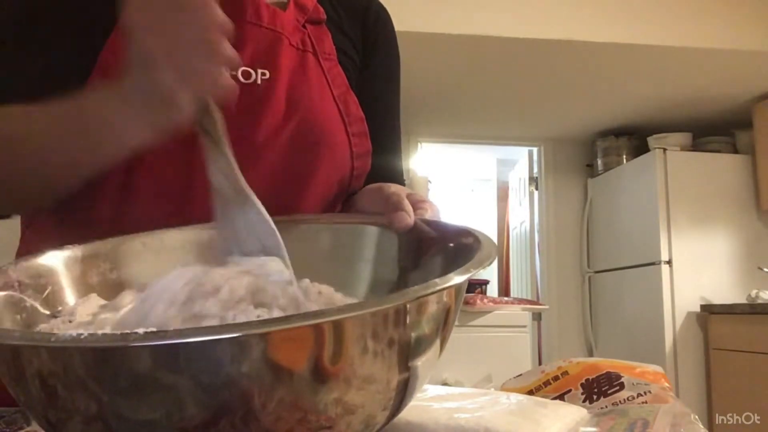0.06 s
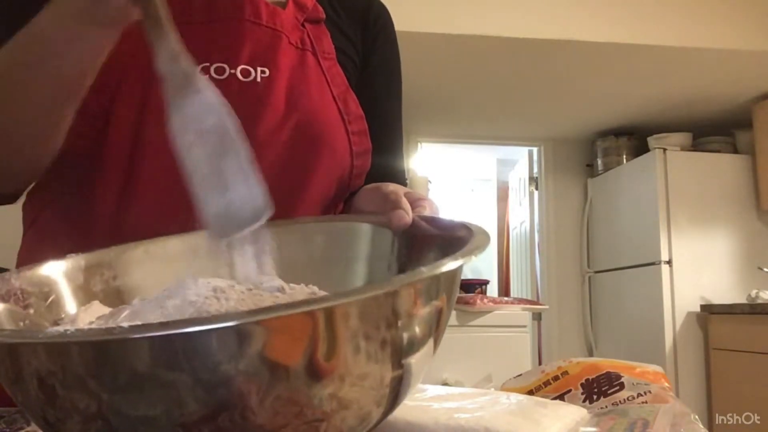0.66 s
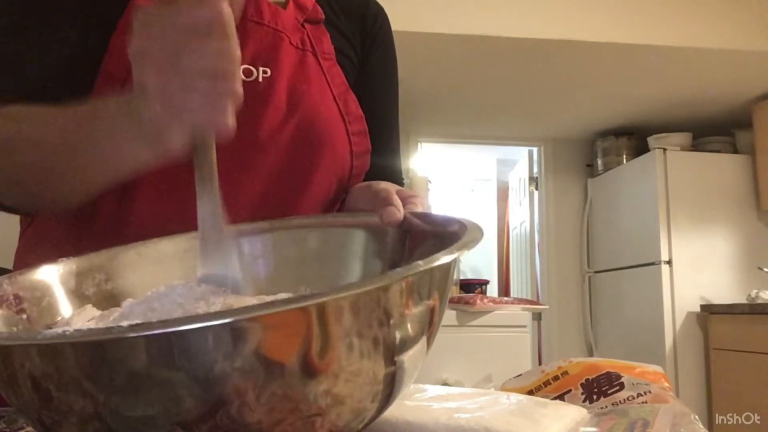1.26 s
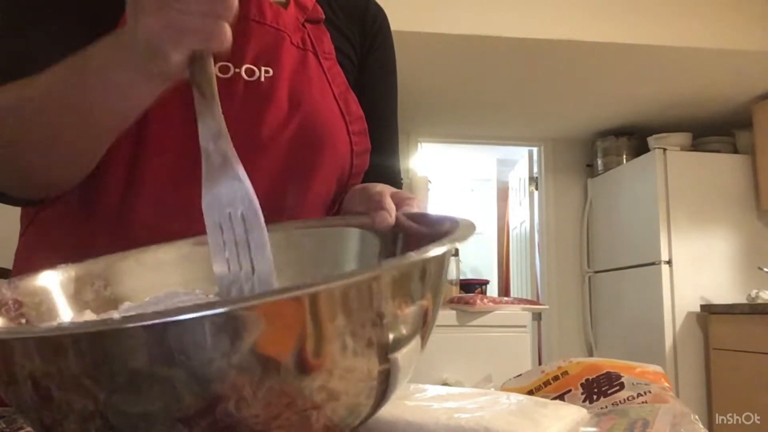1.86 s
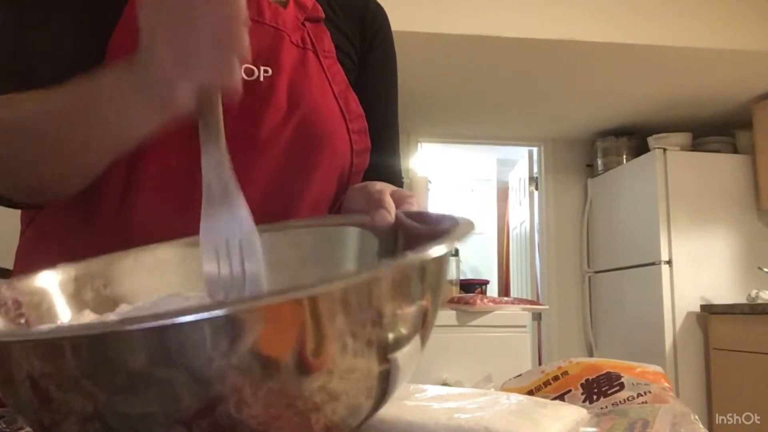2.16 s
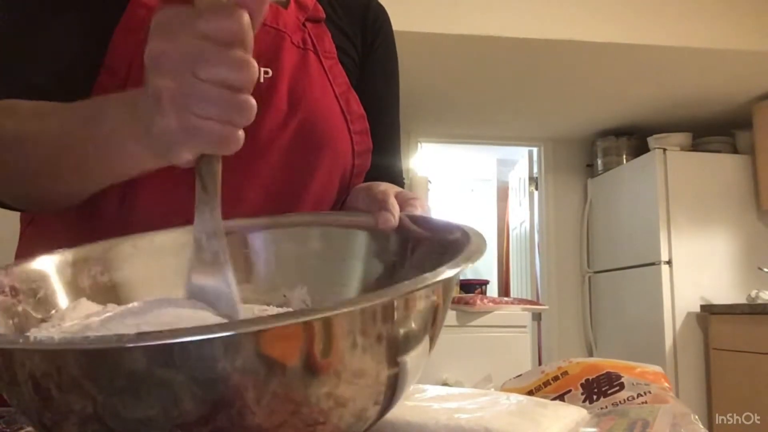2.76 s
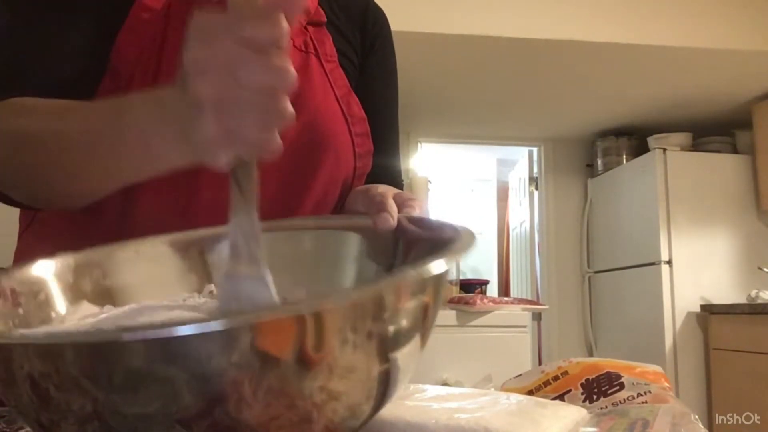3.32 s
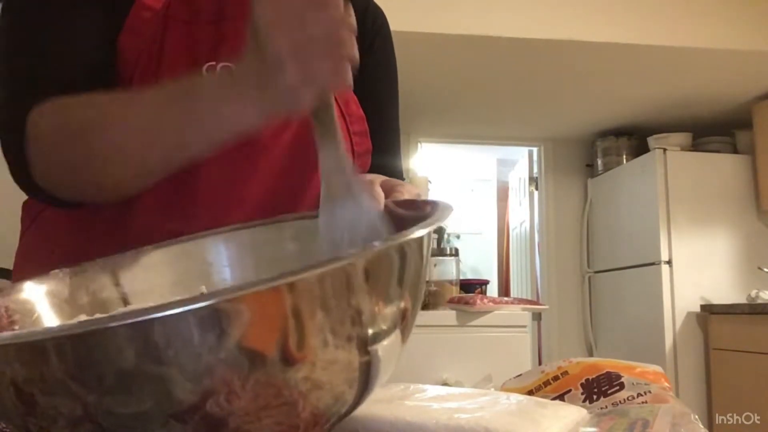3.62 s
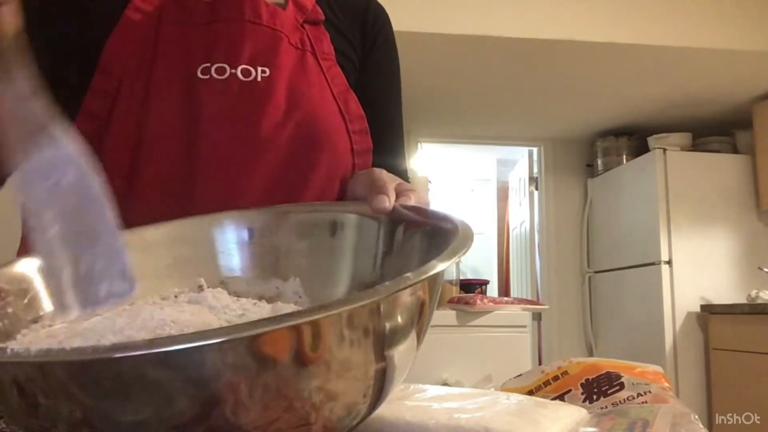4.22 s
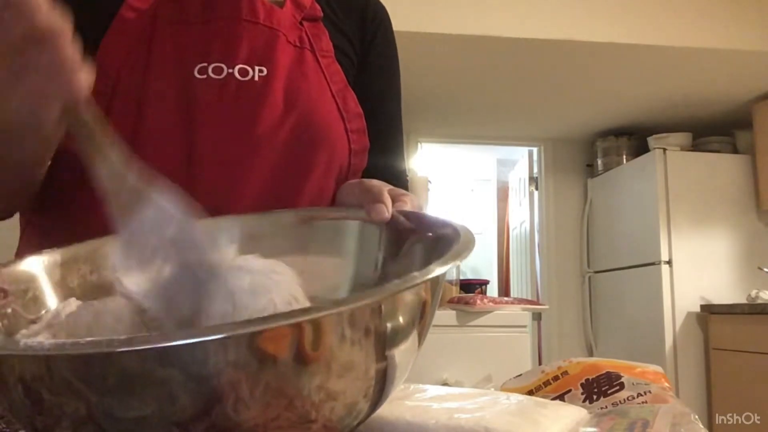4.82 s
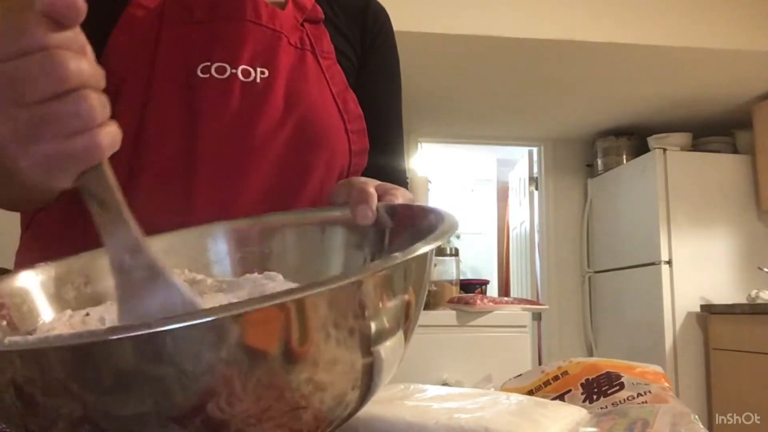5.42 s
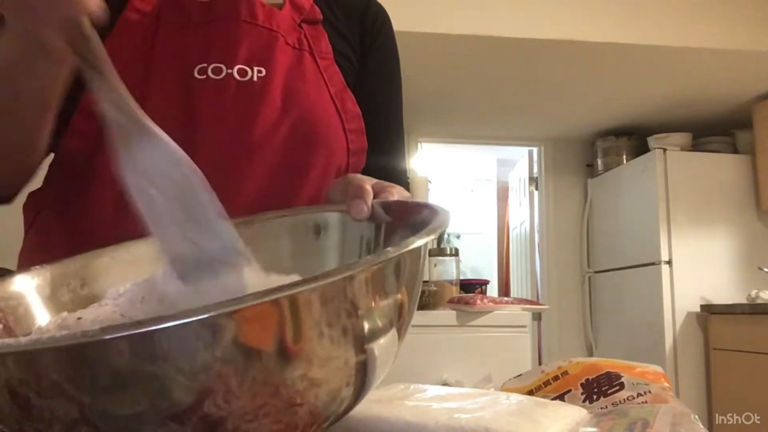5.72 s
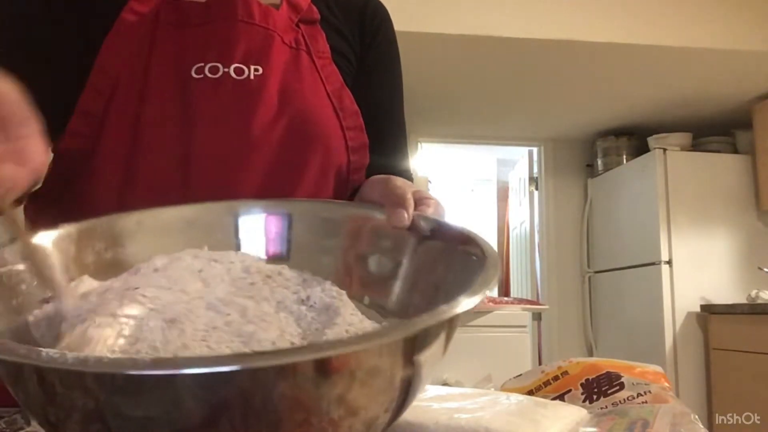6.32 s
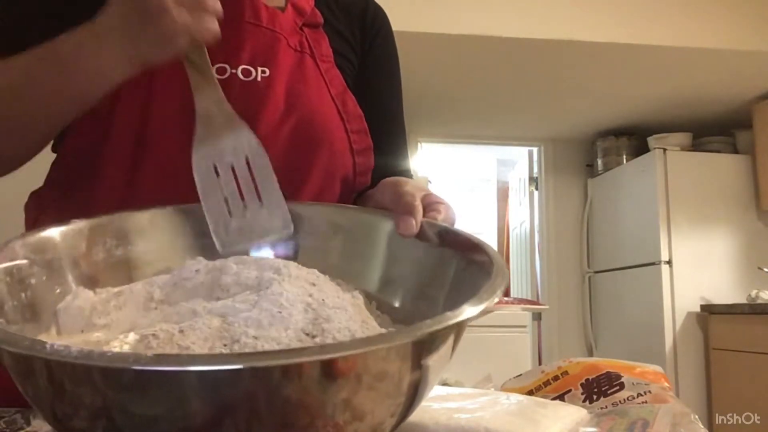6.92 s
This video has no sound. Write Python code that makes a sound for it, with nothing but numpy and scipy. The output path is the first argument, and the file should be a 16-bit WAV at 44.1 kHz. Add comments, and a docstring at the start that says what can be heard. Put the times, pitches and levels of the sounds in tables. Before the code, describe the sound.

Dry flour is stirred in a metal bowl, with soft gritty scrapes, dull ringing knocks and a final clack on the rim.

```python
"""Stirring flour in a steel bowl

A spatula stirs and chops dry flour mix in a hand-held steel bowl. The blade scrapes over trapped
grains, powder hisses off it, and it ticks now and then. It lands on the padded bottom with thuds that
sweep down in pitch and taps the wall; the handle clacks twice on the rim. A small kitchen rumbles softly."""
import sys
import numpy as np
from scipy import signal
from scipy.fft import rfft, irfft
from scipy.io import wavfile

SR = 44100
rng = np.random.default_rng(int(sys.argv[2]) if len(sys.argv) > 2 else 0)


def inscribe(sig):
    """Save sig as 16-bit PCM at rate SR to the path in sys.argv[1].

    A 1-D sig is mono; a 2-D sig holds one channel per row.
    Samples are clipped to [-1, 1] before scaling.
    """
    pcm = np.round(np.clip(np.atleast_2d(sig).T, -1, 1) * 32767)
    wavfile.write(sys.argv[1], SR, pcm.astype(np.int16))


N = 307818

# tone curves of the room's rumble, the gritty scrape and the powder's hiss: f/Hz, level/dB
ROOM_TONE_EQ = [(40, -43), (62, 4), (100, -1), (155, -2), (230, -12.5), (300, -11), (600, -18.5),
                (850, -26), (1500, -25), (4500, -30), (7000, -33), (14000, -39.5), (16000, -47)]
SCRAPE_EQ = [(120, 21), (300, 8), (550, 10.5), (800, 5.5), (1150, -1), (1800, -0.5), (2500, -1),
             (3800, -1.5), (6000, -9), (10000, -21), (16000, -35)]
POWDER_EQ = [(700, -13), (2000, -0.5), (4000, -2), (5700, 2.5), (7500, -0.5), (9500, -4.5), (10900, -0.5),
             (12300, -10), (14000, -3.5), (16000, -15)]
# the blade pushes through the mix: t/s of the hardest push, rise/s, fall/s, scrape/dB, powder/dB, f/Hz
STROKES = [(.315, 0.024, 0.088, -57.5, -55.5, 4100), (0.374, 0.01, 0.018, -41.5, -58, 1560),
           (0.802, 0.017, 0.06, -67, -52, 2200), (0.856, 0.023, 0.012, -43.5, -55.5, 1060),
           (1.278, 0.051, .035, -49, -53.5, 900), (1.618, 0.0094, 0.048, -45, -53, 1500),
           (1.943, 0.0068, 0.019, -53, -50, 900), (2.208, 0.017, 0.04, -61, -57.5, 800),
           (2.45, 0.0078, .025, -46.5, -52, 750), (2.678, 0.011, 0.022, -43, -50.5, 735),
           (2.76, 0.0087, 0.026, -55, -65, 700), (3.155, 0.027, .025, -43, -48, 1200),
           (3.189, 0.018, 0.033, -44, -46.5, 1370), (3.28, 0.047, 0.058, -50.5, -59.5, 1120),
           (3.625, .008, 0.065, -66, -52.5, 700), (3.75, 0.065, 0.059, -49.5, -56, 970),
           (4.21, 0.033, 0.062, -66, -65, 6400), (4.395, 0.039, 0.032, -44.5, -53, 3600),
           (4.455, 0.039, 0.033, -45.5, -51, 1290), (4.62, 0.15, 0.14, -59, -73, 900),
           (5.17, 0.05, 0.073, -51, -53, 1740), (5.32, 0.051, .04, -54, -64, 3040),
           (5.46, 0.11, 0.077, -51.5, -72, 850), (5.599, 0.03, 0.034, -55.5, -61, 1590),
           (5.94, .015, 0.089, -50, -59.5, 2220), (6.045, 0.072, 0.085, -49, -58.5, 1120),
           (6.21, 0.034, 0.079, -55.5, -61.5, 900), (6.69, 0.049, 0.021, -56.5, -62.5, 1040)]
# after a lift, powder slides off the blade and falls back: t/s, level/dB
SPILLS = [(.13, -68.5), (.52, -61.5), (.98, -61.5), (1.41, -64.5), (1.79, -69), (2.08, -64.5),
          (2.34, -66.5), (2.57, -65), (2.86, -65.5), (3.41, -63), (3.95, -62)]
# the bowl's ring, its upper modes damped by flour and hand: f/Hz, width/Hz, level/dB
BOWL_MODES = [(87.4, 4, -6), (150.9, 6.4, -0.5), (282.3, 5.9, -1), (381.3, 5.2, -2), (458, 6.6, -1),
              (503, 12.5, 3), (533.8, 8.8, 1), (584, 26, 3), (945, 170, -8), (1234, 67, 1.5),
              (1503, 235, -5), (1880, 140, -2), (2600, 320, -14.5), (2920, 54, -3), (4240, 670, -11.5),
              (5660, 750, -15), (7040, 1600, -26)]
# the spatula ticks: t/s, level/dB, f/Hz
TICKS = [(0.1515, -46.5, 5300), (0.3094, -42, 5370), (3.5603, -36.5, 5560), (3.582, -46, 5660),
         (3.592, -34, 5600), (3.598, -42, 5600), (3.617, -27.5, 5320), (4.8357, -39.5, 5440),
         (6.1563, -41, 5700)]
# the ring of a tick: multiple of its pitch, width/Hz, level/dB
SPATULA_MODES = [(1, 228, 9), (1.09, 452, 4), (1.4, 900, -7), (2.05, 2600, -15)]
# the blade lands and flexes the bowl: t/s, level/dB, low f/Hz, high f/Hz, lag of each pitch/cycles
THUDS = [(0.3644, -34.5, 51.3, 302, 4.04), (.755, -35, 350, 1510, 2.2), (0.777, -36.5, 90.5, 300, 2.1),
         (0.853, -28.5, 63, 97, 3.37), (1.188, -38, 300, 700, 2.3), (1.207, -34, 168, 724, 2.43),
         (1.2755, -39, 57.6, 900, 4.3), (1.61, -22.5, 69, 500, 2.92), (1.6333, -13, 88, 233, 1.75),
         (1.9398, -9, 113, 247, 2.17), (2.2067, -7.5, 109, 216, 1.94), (2.448, -14, 66, 554, 2.23),
         (2.6732, -9.5, 170, 466, 1.92), (2.6833, -5.5, 101, 212, 1.24), (3.093, -37.5, 220, 700, 1.8),
         (3.1781, -26, 79.5, 866, 1.93), (3.644, -35, 135, 750, 2.2), (4.388, -40, 140, 300, 2.15),
         (5.0865, -31.5, 108, 760, 2.31), (6.952, -26.5, 308, 640, 2.2)]
# the blade taps the bare wall: t/s, level/dB, body trim/dB, treble trim/dB
TAPS = [(0.3681, -33, 3, -22), (0.3774, -26.5, -13.5, -19.5), (0.7557, -27, -22, -19.5),
        (0.7795, -27.5, -14, -26), (0.856, -32, -6, -25), (1.1892, -43, -1, -14), (1.2095, -40.5, -4, -8),
        (1.278, -42, 5, -9), (1.6047, -39.5, 3.5, -27), (1.6113, -20, -5.5, -35), (1.9393, -42.5, -9, -7.5),
        (2.2045, -28.5, -8, -15), (2.4497, -34.5, -8, -12.5), (2.501, -37.5, -1, -16.5),
        (2.674, -26, -9, -17), (2.7561, -42.5, 3, -12), (3.0918, -38.5, -9, -13),
        (3.1444, -28.5, -0.5, -24), (3.1804, -31, 2, -8), (3.6182, -31.5, 1, -18), (3.645, -32, -1.5, -20),
        (4.3873, -26.5, -7.5, -17), (4.3939, -29.5, -3.5, -6), (5.0863, -30, 4.5, -12.5),
        (5.9239, -43, -4, 1.5), (6.9538, -27, 0.5, -3.5)]
# the handle knocks on the rim: t/s, level/dB
KNOCKS = [(5.0862, -37.5), (6.9537, -17.5)]
# the wooden handle's ring: f/Hz, width/Hz, level/dB
HANDLE_MODES = [(524, 150, -0.5), (1237, 40, 14.5), (1800, 120, 3), (3020, 80, -3), (4340, 160, 5.5),
                (5240, 800, -11)]
# early reflections off the counter, the cook and the walls: delay/s, gain
ECHOES = [(.0018, 0.14), (.004, -0.11), (.0073, 0.15), (.0088, -0.23), (0.0203, .19), (0.0492, -0.12)]


def from_db(db):
    """Decibels to gain."""
    return 10 ** (np.asarray(db) / 20)


def at_peak(x, db):
    """Set a sound's peak level."""
    return from_db(db) * x / np.abs(x).max()


def add(out, s, sound):
    """Mix a sound in at s seconds."""
    start = max(round(s * SR), 0)
    out[start:start + len(sound)] += sound[:max(N - start, 0)]


def butter(x, hz, kind, order=2):
    """Low- or high-pass filter."""
    return signal.sosfilt(signal.butter(order, hz, kind, fs=SR, output="sos"), x)


def coloured(x, curve):
    """Shape noise with a tone curve, rolling off the bass below it; rms 1."""
    hz, db = np.transpose(curve)
    bin_hz = np.maximum(np.arange(N // 2 + 1) * SR / N, 1)
    gain = from_db(np.interp(np.log(bin_hz), np.log(hz), db)) / np.hypot(1, (hz[0] / bin_hz) ** 2)
    shaped = irfft(rfft(x) * gain, N)
    return shaped / np.sqrt(np.mean(shaped ** 2) + 1e-20)


def resonate(x, modes):
    """Ring a bank of parallel resonators of alternating polarity."""
    out = 0
    for k, (hz, width, db) in enumerate(modes):
        r = np.exp(-np.pi * width / SR)
        poles = [1, -2 * r * np.cos(2 * np.pi * hz / SR), r * r]
        ring = (1 - r * r) / 2 * signal.lfilter([1, 0, -1], poles, x + 1e-18)
        out = out + (-1) ** k * from_db(db) * ring
    return out


def room_tone(level_db):
    """A soft, steady bed of rumble."""
    return from_db(level_db) * coloured(rng.standard_normal(N), ROOM_TONE_EQ)


def grains(per_s, spread_db):
    """Grains of the mix: random clicks of uneven size."""
    sizes = from_db(spread_db * np.minimum(rng.exponential(1, N), 4))
    return (rng.random(N) < per_s / SR) * sizes * rng.standard_normal(N)


def flicker(depth_db, per_s):
    """A gain that wavers at random."""
    steps = rng.standard_normal(N)
    return from_db(depth_db * np.interp(np.arange(N) * per_s / SR, np.arange(N), steps))


def swept(x, centre, lift_db, width_octaves, db_per_octave):
    """Sweep a broad peak along centre (log2 Hz), tilting the treble from an octave above it; rms 1."""
    octaves = np.log2(np.maximum(np.arange(N // 2 + 1) * SR / N, 1))
    spectrum = rfft(x)
    out, power = 0, 0
    for octave in np.arange(7, 14.5, .5):
        band = irfft(spectrum * np.maximum(1 - 2 * np.abs(octaves - octave), 0), N)
        gain = 1 + (from_db(lift_db) - 1) / (1 + ((octave - centre) / width_octaves) ** 2)
        gain *= from_db(db_per_octave * np.maximum(octave - centre - 1, 0))
        out += gain * band
        power += gain ** 2 * np.mean(band * x)
    return out / np.sqrt(power)


def blade_motion():
    """Strokes and spills add up to pressure on the steel, powder flow and scrape pitch (log2 Hz)."""
    spill_rise_s, spill_fall_s, patter_db, patter_hz = 0.12, 0.052, -2, 900
    rest_scrape_db, rest_powder_db, rest_hz = -75.5, -77, 1200   # the blade rests in the mix
    roundness = 1.17   # 1 is a pointed swell, 2 a bell
    sink_octaves_per_s = 2.3   # the scrape darkens as the blade sinks under the heap
    spills = [(s, spill_rise_s, spill_fall_s, db + patter_db, db, patter_hz) for s, db in SPILLS]
    scrape_power = np.full(N, from_db(rest_scrape_db) ** 2)
    powder_power = np.full(N, from_db(rest_powder_db) ** 2)
    weighted_pitch = scrape_power * np.log2(rest_hz)
    for s, rise_s, fall_s, scrape_db, powder_db, hz in STROKES + spills:
        start_s = max(s - .5, 0)
        t = start_s - s + np.arange(SR) / SR
        push = np.exp(-np.abs(t / np.where(t < 0, rise_s, fall_s)) ** roundness)
        power = (from_db(scrape_db) * push) ** 2
        add(scrape_power, start_s, power)
        add(powder_power, start_s, (from_db(powder_db) * push) ** 2)
        add(weighted_pitch, start_s, power * (np.log2(hz) - sink_octaves_per_s * t))
    return np.sqrt(scrape_power), np.sqrt(powder_power), weighted_pitch / scrape_power


def stirring(scrape_db, hiss_db, ring_db):
    """The blade slips over grains trapped against the steel; finer powder slides off it with a hiss."""
    pressure, flow, pitch = blade_motion()
    grit = coloured(grains(per_s=2400, spread_db=2.0), SCRAPE_EQ)
    slips = swept(grit, pitch, lift_db=9, width_octaves=0.51, db_per_octave=-1.5)
    slips *= flicker(depth_db=2.5, per_s=90) * pressure
    scrape = slips + from_db(ring_db) * resonate(slips, BOWL_MODES)
    hiss = coloured(grains(per_s=19000, spread_db=1.0), POWDER_EQ)
    hiss *= flicker(depth_db=1.3, per_s=150) * flow
    return from_db(scrape_db) * scrape + from_db(hiss_db) * hiss


def contact(crunch, crunch_s):
    """A sharp attack with a short tail of crushed powder."""
    t = np.arange(SR // 5) / SR
    return (t == 0) + crunch * rng.standard_normal(len(t)) * np.exp(-t / crunch_s)


def spatula_ticks(trim_db):
    """The spatula gives thin, scratchy ticks as its load changes."""
    out = np.zeros(N)
    for s, db, hz in TICKS:
        modes = [(hz * multiple, width, mode_db) for multiple, width, mode_db in SPATULA_MODES]
        ring = resonate(contact(crunch=0.051, crunch_s=0.017), modes)
        add(out, s, at_peak(ring, db + trim_db))
    return out


def bottom_thuds(ring_db, sweep_db, stiff_hz):
    """High bending waves outrun low ones in thin steel: each blow sweeps down and rings the bowl."""
    sweeps, t = np.zeros(N), np.arange(1, SR // 5) / SR
    for s, db, low_hz, high_hz, cycles in THUDS:
        hz = cycles / t
        envelope = from_db(db) / np.hypot(1, (low_hz / hz) ** 4) / np.hypot(1, (hz / high_hz) ** 2.4)
        envelope /= np.hypot(1, (stiff_hz / hz) ** 10)   # the bowl is too small to flex any slower
        add(sweeps, s, envelope * np.sin(2 * np.pi * cycles * np.log(t / t[0])))
    return from_db(sweep_db) * sweeps + from_db(ring_db) * resonate(sweeps, BOWL_MODES)


def wall_taps(middle_db, hollow_db, hard_db, low_hz, high_hz):
    """Each tap rings the bowl; a padded contact sounds hollow, a hard one carries more treble."""
    out = np.zeros(N)
    for s, db, body_db, treble_db in TAPS:
        ring = resonate(contact(crunch=0.075, crunch_s=0.0067), BOWL_MODES)
        body = butter(ring, low_hz, "low", order=4)
        middle = butter(butter(ring, low_hz, "high", order=3), high_hz, "low")
        treble = butter(ring, high_hz, "high", order=4)
        add(out, s, at_peak(body, db + body_db + hollow_db))
        add(out, s, at_peak(middle, db + middle_db))
        add(out, s, at_peak(treble, db + treble_db + hard_db))
    return out


def handle_knocks(trim_db):
    """Wood on the rim gives a short, hard clack."""
    out = np.zeros(N)
    for s, db in KNOCKS:
        ring = resonate(contact(crunch=0.035, crunch_s=0.0052), HANDLE_MODES)
        add(out, s, at_peak(ring, db + trim_db))
    return out


def near_echoes(x, dull_hz):
    """Nearby surfaces throw back distinct, darkened echoes."""
    out, dull = np.zeros(N), butter(x, dull_hz, "low", order=1)
    for delay_s, gain in ECHOES:
        add(out, delay_s, gain * dull)
    return out


def kitchen_reverb(x, t60_s, dull_hz, predelay_s):
    """Dense reflections off the walls blur into a short, dulled tail."""
    t = np.arange(SR // 2) / SR
    tail = rng.standard_normal(len(t)) * from_db(-60 * t / t60_s) * (t > predelay_s)
    tail /= np.sqrt(np.sum(tail ** 2))
    return butter(signal.fftconvolve(x, tail)[:N], dull_hz, "low", order=1)


def scene():
    """The bowl up close with the kitchen around it, in mono."""
    bowl = bottom_thuds(ring_db=-3.0, sweep_db=-0.88, stiff_hz=52.6)
    bowl += wall_taps(middle_db=-7.5, hollow_db=-4.5, hard_db=8.5, low_hz=874, high_hz=3250)
    bowl += handle_knocks(trim_db=0.5)
    bowl += spatula_ticks(trim_db=-2.0)
    bowl += stirring(scrape_db=-0.5, hiss_db=2.5, ring_db=-9.5)
    send = butter(bowl, 160, "high")   # reverb on mids and treble only; the low ring is the bowl's own
    reverb = from_db(-11.5) * kitchen_reverb(send, t60_s=0.42, dull_hz=7300, predelay_s=0.0052)
    return (bowl + near_echoes(bowl, dull_hz=2080) + reverb + room_tone(level_db=-55))[None]


def record(dry):
    """The microphone sheds the deepest bass; a steep high cut takes off the very top."""
    thinned = butter(dry, 46, "high", order=3)
    high_cut = signal.ellip(10, .2, 80, 15900, fs=SR, output="sos")
    return signal.sosfilt(high_cut, thinned)


dry = scene()
out = record(dry)
inscribe(out)
```